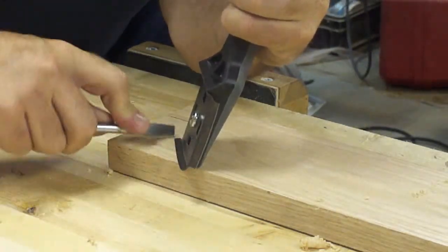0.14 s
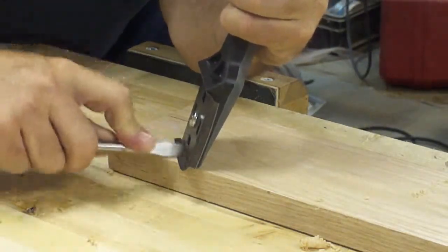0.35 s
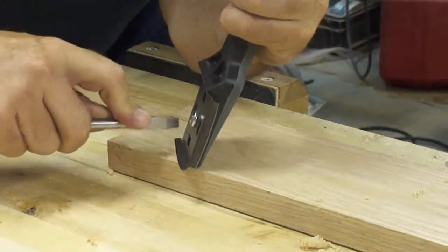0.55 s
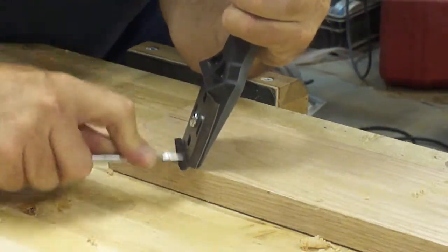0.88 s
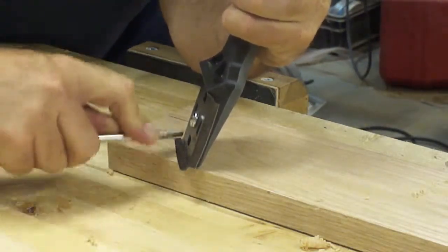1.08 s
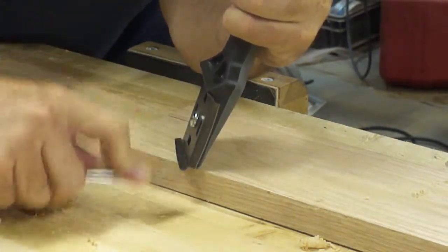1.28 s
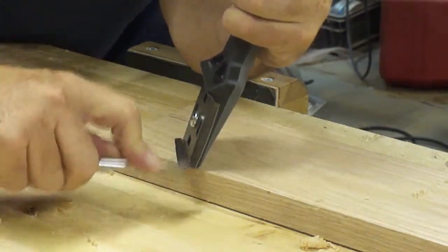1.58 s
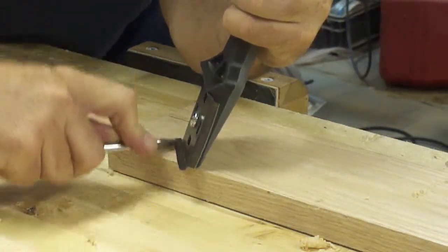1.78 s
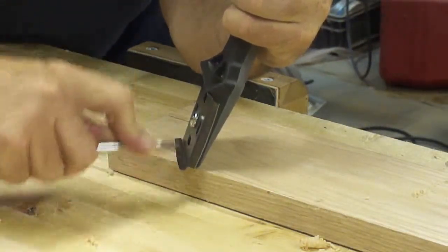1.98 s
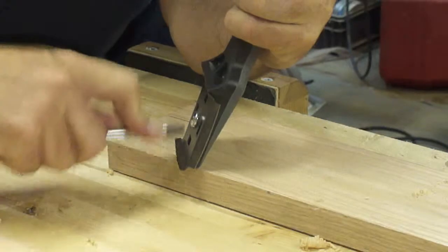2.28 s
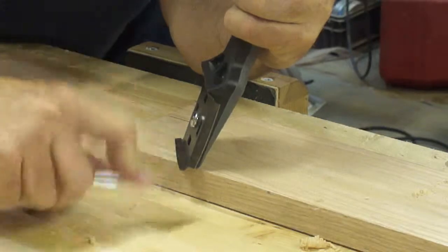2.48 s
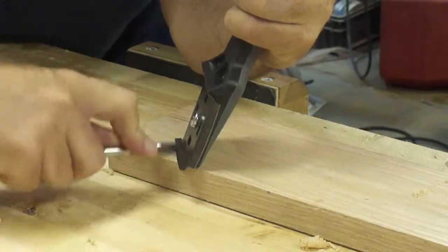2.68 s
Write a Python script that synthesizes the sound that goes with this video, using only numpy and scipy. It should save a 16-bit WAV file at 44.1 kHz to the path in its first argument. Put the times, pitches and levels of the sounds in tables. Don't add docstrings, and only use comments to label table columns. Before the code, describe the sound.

A screwdriver shaft strikes a steel scraper blade about a dozen times, short dry clacks followed by brief gritty scrapes, first in uneven pairs, then steadier; close microphone, hard early echoes, short workshop tail, faint hiss.

```python
import sys
import numpy as np
from scipy import signal
from scipy.fft import rfft, irfft
from scipy.io import wavfile

SR = 44100
rng = np.random.default_rng(int(sys.argv[2]) if len(sys.argv) > 2 else 0)


def ratio(d):
    e = np.asarray(d, float) / 20
    return 10 ** e


def master_out(mix):
    frames = np.transpose(np.atleast_2d(mix))
    ceiling = np.clip(frames, -1, 1)
    pcm = np.round(ceiling * 32767).astype(np.int16)
    wavfile.write(sys.argv[1], SR, pcm)


N = 125685

# (time [s], force [dB], brightness [dB per octave], bench thud [dB], handle ring [dB])
KNOCKS = [(0.0666, -11, 9, 1, 2), (0.1826, -4.5, -9.5, 1, 0.5), (0.3878, -7, 6, 4, 1),
          (0.4951, -2.5, -6.5, -2, -1.8), (0.866, -6, -2, -16, 5.5), (1.1838, -7.5, 4, -7, 2),
          (1.2546, -10.5, 8, -5, -7), (1.5195, -5, 2, 5, -12), (1.8206, -9.5, 2, 17.7, 11),
          (2.1456, -3.5, 1.5, -2, 3), (2.4196, -4.5, 1.5, -11, 3.5), (2.7096, 1.5, -8.5, -15, 3.5)]
# (start [s], length [s], level [dB], brightness [dB per octave], bench rumble [dB])
DRAGS = [(0.058, 0.17, -42, -1, 13.5), (0.392, 0.087, -41, 0.5, 16.5), (.445, 0.082, -34, -5.5, -2),
         (0.868, 0.084, -37, -2, 1), (0.93, 0.055, -37.5, 6, 16.2), (1.192, 0.084, -38, -4.5, 2),
         (1.237, 0.066, -36, 8.5, 22.5), (1.526, 0.031, -35.5, -29, -15), (1.554, 0.023, -28.5, -3, 12),
         (1.577, 0.041, -37.5, 5, 14.5), (1.829, 0.092, -40.5, -12.5, 4), (1.874, 0.048, -32, 7, 15.5),
         (2.149, 0.029, -31.5, -6.5, -20), (2.191, 0.029, -31.5, 4.5, 18.5), (2.428, 0.049, -38, -1, -7),
         (2.463, 0.052, -34.5, 6, 19.5), (2.736, 0.092, -36.5, -1, 13.5), (2.812, 0.021, -35, 5, 26.5),
         (0.38, 0.015, -55, 11, -9), (1.503, 0.014, -53, 6, -9), (2.411, 0.0067, -50, 11, -5)]
# (frequency [Hz], level [dB], time to fall 60 dB [s])
BODY_MODES = [(249.5, -18.5, 0.1), (340, -49, 0.12), (460, -59.5, 0.18), (469.4, -7, 0.069),
              (634.7, -3.5, 0.073), (745, -49, 0.013), (915, 0.5, 0.029), (964, 4, .06), (970, -22, 0.044),
              (1518, -9.5, 0.071), (1543, 0.5, 0.036), (1832, 5, 0.038), (1990, 7.5, 0.02),
              (2046, 6.5, 0.025)]
# (frequency [Hz], level [dB], time to fall 60 dB [s])
BLADE_MODES = [(1074, -61, 0.023), (2360, -16, 0.022), (2805, -7.5, 0.058), (3080, 8, 0.011),
               (3510, -69, 0.0067), (4324, 3, 0.011), (4740, 2, 0.013), (5120, 4, 0.0075),
               (5703, 5.5, 0.0048), (6100, 2, 0.011), (6610, -2, 0.013), (7180, -11, 0.011),
               (1700, -1.5, .03), (563, -1.5, 0.029)]
# (frequency [Hz], level [dB])
TICK_TONE = [(200, -16), (1000, -11), (2000, 14.5), (5000, -2.5), (8000, -7.5), (11000, -26)]
# (delay [s], level [dB])
ECHOES = [
    (.0036, -5.5),
    (.0077, -1),
    (0.0089, -9),
]
# (frequency [Hz], time to fall 60 dB [s])
SHOP_DECAY = [(150, 1), (400, 0.44), (1000, .5), (2500, 0.35), (5000, 0.39), (10000, 0.22)]
# (frequency [Hz], level [dB per Hz])
HISS_TONE = [(12, -54), (20, -6), (174, -14.5), (346, 7), (1110, -2.5), (1260, -7.5), (1370, 0),
             (1600, -5.5), (11000, -25), (14300, -64), (22000, -120)]
# (time [s], level [dB])
HUM_LEVEL = [(0.0, -71), (1.02, -66.5), (1.19, -70), (1.52, -61.5), (1.98, -56.5), (2.85, -67.5)]

LEAD_S = 0.3
TICK_DB, DRAG_TICK_DB = -12.5, 0
PIVOT_HZ = 2370
BENCH_HZ = 600
HANDLE_HZ, HANDLE_OCTAVES = 990, 0.13


def evened(x):
    return x / np.sqrt(np.mean(x ** 2) + 1e-20)


def read(points, hz):
    f, value = np.transpose(points)
    return np.interp(np.log(hz + 1), np.log(f + 1), value)


def add(mix, time_s, sound):
    part = mix[round((time_s + LEAD_S) * SR):][:len(sound)]
    part += sound[:len(part)]


def coloured(x, db_at):
    hz = np.fft.rfftfreq(len(x), 1 / SR)
    return irfft(rfft(x) * ratio(db_at(hz)), len(x))


def knock(*colour):
    chatter_db, chatter_s = -25, 0.00095
    crack_db, crack_hz, crack_s = -17.5, 4900, 0.00036
    t = np.arange(400) / SR
    chatter, hiss = rng.standard_normal((2, len(t)))
    blow = (t == 0) + ratio(chatter_db) * chatter * np.exp(-t / chatter_s)
    sound = signal.fftconvolve(blow, ring(*colour, TICK_DB))
    high_pass = signal.butter(2, crack_hz, "high", fs=SR)
    crack = signal.lfilter(*high_pass, hiss * np.exp(-t / crack_s))
    crack = np.pad(crack / np.linalg.norm(crack), (0, len(sound) - len(t)))
    brightness = colour[0]
    return sound / np.linalg.norm(sound) + ratio(crack_db + 1.3 * brightness) * crack


def drag(start, length, level_db, tilt_db, bench_db):
    slips_per_s, uneven_db, peak_at = 4000, 3.5, 0.55
    draw = rng.random((7000, 3))
    happens = draw[:, 0] < slips_per_s / SR
    size = ratio(uneven_db * np.minimum(-np.log(draw[:, 1]), 4))
    slips = happens * size * np.sign(draw[:, 2] - 0.5)
    u = np.arange(len(draw)) / (length * SR)
    stroke = np.interp(u, [0, peak_at, 1], [0.3, 1, 0]) * np.minimum(u * 20, 1)
    sound = signal.fftconvolve(slips * stroke, ring(tilt_db, bench_db, 0, DRAG_TICK_DB))
    strength = np.sqrt((sound ** 2).sum() / (length * SR))
    return start, ratio(level_db) * sound / strength


def ring(tilt_db, bench_db, handle_db, tick_db):
    place_db, detune = 1, 0.0061

    def colour_db(f):
        octave = np.log2((f + 50) / HANDLE_HZ)
        tilt = tilt_db * np.log2(1 + (f / PIVOT_HZ) ** 2) / 2
        thud = bench_db / (1 + (f / BENCH_HZ) ** 6)
        return tilt + thud + handle_db * np.exp(-(octave / HANDLE_OCTAVES) ** 2)

    hz, db, t60 = np.transpose(BODY_MODES + BLADE_MODES)[:, :, None]
    t = np.arange(8192) / SR
    grip, place, phase = rng.uniform(-1, 1, (3, len(hz), 1))
    db = db + colour_db(hz) + place_db * place
    waves = np.sin(2 * np.pi * hz * (1 + detune * grip) * t + 0.94 * phase)
    modes = (ratio(db - 60 * t / t60) * waves).sum(0)
    f = abs(np.fft.fftfreq(len(t), 1 / SR))
    log_size = np.log(ratio(read(TICK_TONE, f) + colour_db(f)))
    tick = np.fft.ifft(np.exp(np.conj(signal.hilbert(log_size)))).real
    soft_start = np.minimum(t / 0.00035, 1)
    return modes / np.linalg.norm(modes) * soft_start + ratio(tick_db) * tick / np.linalg.norm(tick)


def jolt(level_db):
    t = np.arange(2000) / SR
    return ratio(level_db) * np.sin(2 * np.pi * 48.6 * t) * np.exp(-t / 0.0027)


def shop_tail():
    start_s, spacing = 0.0025, 20
    taps = np.zeros(SR)
    at = np.arange(0, SR - spacing, spacing)
    taps[at + rng.integers(0, spacing, len(at))] = rng.choice([-1., 1.], len(at))
    hz, t, z = signal.stft(taps, SR, nperseg=256)
    fade = ratio(-60 * t / read(SHOP_DECAY, hz)[:, None])
    tail = signal.istft(z * fade, SR, nperseg=256)[1]
    return np.r_[np.zeros(round(start_s * SR)), tail / np.linalg.norm(tail)]


def shop(x):
    echo_hz, tail_db = 3860, 1
    out = x.copy()
    dull = signal.lfilter(*signal.butter(2, echo_hz, fs=SR), x)
    for delay_s, db in ECHOES:
        delay = round(delay_s * SR)
        out[delay:] += ratio(db) * dull[:-delay]
    turn = np.arange(len(x)) / SR * 2.425
    for k in range(3):
        share = np.cos(turn + k * np.pi / 3) * np.sqrt(2 / 3)
        out += ratio(tail_db) * signal.fftconvolve(x * share, shop_tail())[:len(x)]
    return out


def air():
    hiss_db, hum_hz, hum_width_hz = -51.5, 127.5, 2.83
    hiss = evened(coloured(rng.standard_normal(N), lambda f: read(HISS_TONE, f)))
    drift = evened(coloured(rng.standard_normal(N), lambda f: -10 * np.log10(1 + (f / 4) ** 4)))
    hum = np.sin(2 * np.pi * np.cumsum(hum_hz + hum_width_hz * drift) / SR)
    hum_db = np.interp(np.arange(N) / SR, *np.transpose(HUM_LEVEL))
    return ratio(hiss_db) * hiss + ratio(hum_db) * evened(hum)


def scene():
    knock_db, jolt_db, mic_hz = 8, -34, 172.5
    tool = np.zeros(N + round(LEAD_S * SR))
    jolts = np.zeros_like(tool)
    add(tool, *drag(-0.19, 0.066, -28.5, -2.1, 0.1))
    for time_s, force_db, *colour in KNOCKS:
        add(tool, time_s, ratio(force_db + knock_db) * knock(*colour))
        add(jolts, time_s, jolt(force_db + jolt_db + 0.89 * colour[0]))
    for row in DRAGS:
        add(tool, *drag(*row))
    low_cut = signal.butter(4, mic_hz, "high", fs=SR, output="sos")
    heard = signal.sosfilt(low_cut, shop(tool))
    return ((heard + jolts)[-N:] + air())[None]


def top_cut(x):
    return signal.sosfilt(signal.butter(12, 11310, fs=SR, output="sos"), x)


def record(dry):
    edge_hz = 10980
    low_pass = signal.firwin(511, edge_hz, window=("kaiser", 9), fs=SR)
    mix = signal.oaconvolve(dry, low_pass[None], "same")
    return top_cut(mix)


dry = scene()
out = record(dry)
master_out(out)
```